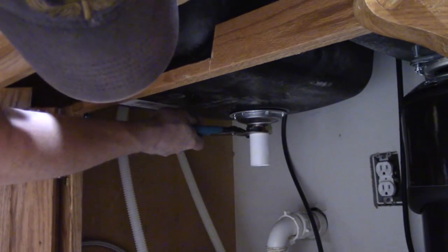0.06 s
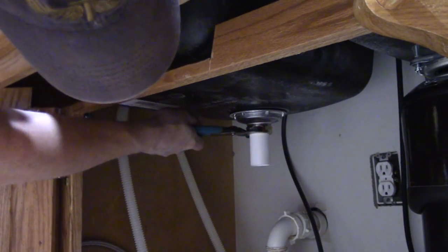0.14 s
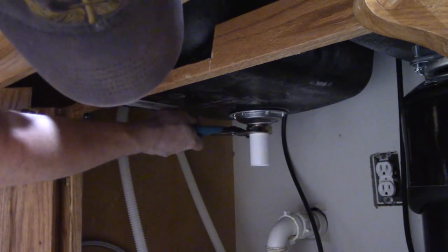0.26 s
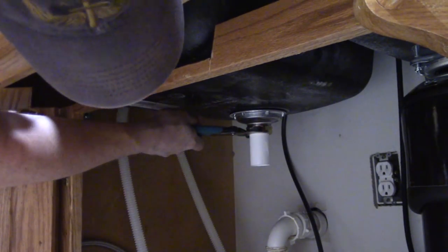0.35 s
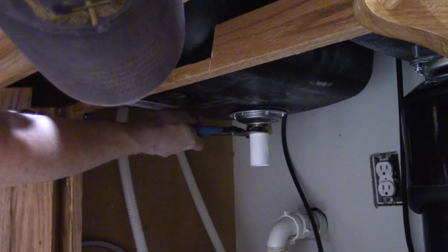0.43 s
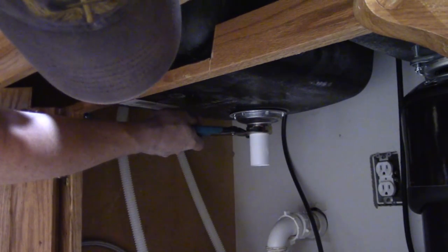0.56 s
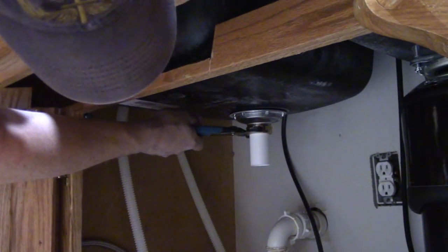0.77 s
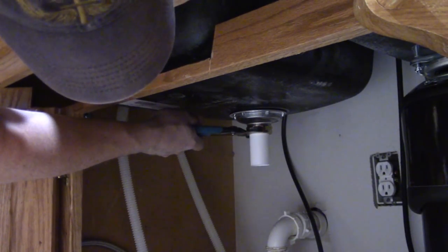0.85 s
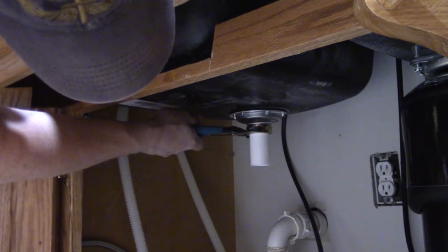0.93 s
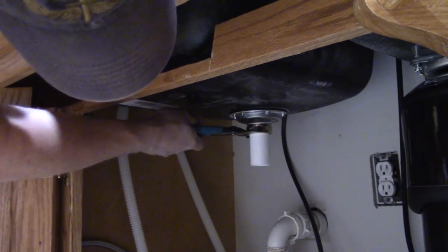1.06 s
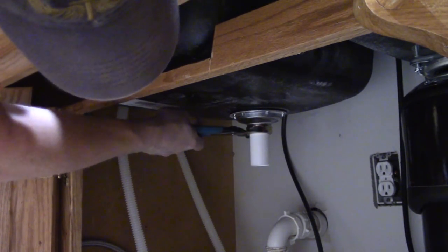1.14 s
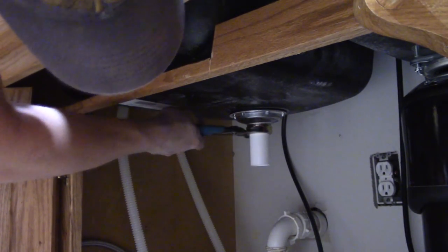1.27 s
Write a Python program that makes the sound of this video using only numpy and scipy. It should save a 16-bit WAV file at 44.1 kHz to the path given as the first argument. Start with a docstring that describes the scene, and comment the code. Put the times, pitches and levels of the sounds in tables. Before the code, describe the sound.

Hollow knocking and clacking as plier jaws scrape and jerk around a plastic nut beneath a sink

```python
"""Pliers slipping on a drain nut

Pliers bite on a plastic drain nut under a sink, slip round it in three jerks and let go; a sleeve rustles.
The jerks knock the basin, the jaws clack, scrape and tink, and the pliers and the steel strainer ring.
Each contact is shaped noise through resonances, with cabinet and kitchen echo; a low room murmur lies beneath.
The close, almost mono microphone overloads on the hardest knocks.
"""
import sys
import numpy as np
from scipy import signal
from scipy.fft import rfft, irfft
from scipy.io import wavfile

SR = 44100
rng = np.random.default_rng(int(sys.argv[2]) if len(sys.argv) > 2 else 0)


def dump_mix(stems):
    """Bounce the given channels to the path in sys.argv[1] as a 16-bit WAV at rate SR."""
    frames = np.atleast_2d(stems).T  # one column per channel
    limited = np.clip(frames, -1, 1)  # hard clip at full scale
    pcm = np.round(limited * 32767).astype(np.int16)
    wavfile.write(sys.argv[1], SR, pcm)


N = 57330
FREQS = np.maximum(np.fft.rfftfreq(2 * N, 1 / SR), 1)  # Hz, for filtering at double length

# Knocks passed to the basin [t/s, level/dB, contact cut-off f/Hz (low = soft push), cabinet boom level/dB]
KNOCKS = [(0.15, -29, 610, -48), (0.187, -24.5, 1090, -39), (.231, -15.5, 606, -31),
          (0.256, -17.5, 317, -51), (.267, -11.5, 1230, -33.5), (.296, -15, 1060, -36),
          (.326, -16, 940, -32.5), (0.342, -18.5, 1150, -34), (.395, -7, 620, -35), (.413, -9.5, 860, -45),
          (.434, -8.5, 556, -21), (.445, -7.5, 637, -28), (.53, -4.5, 1300, -29), (.562, -5.5, 380, -19),
          (.573, -15.5, 860, -22), (.593, -16, 700, -28), (.621, -10, 440, -23), (.643, -11.5, 395, -26),
          (0.681, -25, 367, -42), (.719, -18.5, 860, -30), (1.156, -30, 260, -52), (1.18, -30.5, 284, -45)]
# Jaw contacts [t/s, then level/dB of: plastic clack, sharp crack, pliers ring, strainer ring]
JAW_CONTACTS = [(.188, -29, -48.5, -41.5, -69), (.197, -30, -49, -47, -57), (.232, -36.5, -49, -55, -51),
                (.264, -28, -30.5, -45, -46), (.27, -27, -27, -28, -56), (.279, -37, -31.5, -36, -40),
                (.325, -40, -46, -53, -45), (.394, -38, -38.5, -54, -54), (.412, -25.5, -29, -54, -50),
                (.44, -54, -42, -63, -54), (.446, -30, -46, -57, -39), (.5295, -28, -21, -35, -36),
                (.557, -29, -27.5, -43, -36.5), (.567, -23, -42, -48, -35), (.576, -37, -29.5, -45, -29),
                (.594, -34.5, -39, -40, -31), (.619, -39, -37.5, -54, -40), (.708, -25.5, -58, -63, -60),
                (1.15, -65, -52.5, -76, -78), (1.178, -62, -49.5, -60, -80)]
# Scrapes of the jaws, and last a faint sleeve rustle [start t/s, length t/s, rasp level/dB, basin level/dB]
SCRAPES_AND_RUSTLE = [(0.276, .11, -42, -15.5), (0.396, .09, -53, -18), (0.531, 0.12, -29, -19),
                      (1.191, 0.063, -49.5, -49.5)]
# Tinks: short high rings of the first click and of one later contact [t/s, f/Hz, width f/Hz, level/dB]
TINKS = [(.189, 2380, 295, -35.5), (.19, 2970, 250, -41.5), (.4165, 5170, 131, -32.5)]

# Resonances of the basin [f/Hz, width f/Hz, relative level/dB]
BASIN_MODES = [(218.8, 24.8, -8.5), (260.5, 32, -8.5), (316, 28, -0.5), (387, 32.6, -3.5),
               (475.8, 37.3, -4), (530.3, 13.6, 1), (574, 24.5, 1.5), (637.4, 45.3, 0.5), (812.5, 66.5, -7),
               (938, 31, -4), (1004, 33.4, -4), (1047, 56, -7.5), (1281, 43, -13), (1618, 72, -16.5)]
# Resonances of the plastic nut [f/Hz, width f/Hz, relative level/dB]
NUT_MODES = [(1216, 110, 8), (1598, 210, 4.5), (2340, 150, -3), (2930, 740, -18)]
# Resonances of the pliers [f/Hz, width f/Hz, relative level/dB]
PLIERS_MODES = [(4120, 210, -7.5), (6560, 190, 1.5), (8660, 190, -0.5), (9800, 160, -11),
                (10350, 180, -11.5), (12800, 300, -16)]
# Resonances of the steel strainer [f/Hz, width f/Hz, relative level/dB]
STRAINER_MODES = [(4975, 97, 2), (5200, 100, 2.5), (5720, 100, 2), (6180, 140, 3.5), (6315, 200, 5),
                  (10000, 370, -17)]

# Spectrum of the sharp crack [f/Hz, relative level/dB]
CRACK_SPECTRUM = [(600, -36), (1500, 14), (3800, -0.5), (4500, -3), (6000, -5.5), (8000, -5.5),
                  (10500, -0.5), (11800, -16.5), (15500, -19)]
# Spectrum of the cabinet boom [f/Hz, relative level/dB]
BOOM_SPECTRUM = [(25, -23), (42, -16), (62, 1.5), (85, -7.5), (130, -10.5), (200, -6.5), (400, -20),
                 (1000, -66)]
# Spectrum of the rasp in scrapes and rustle [f/Hz, relative level/dB]
RASP_SPECTRUM = [(300, 4.5), (1200, 3.5), (2200, 2.5), (4000, -9), (6300, -7), (8000, -20), (10200, -12),
                 (12000, -28), (16000, -25)]
# Spectrum of the kitchen air [f/Hz, relative level/dB]
AIR_SPECTRUM = [(15, -43), (25, -4.5), (137, -11), (170, -5.5), (206, -10.5), (242, -3.5), (373, -3.5),
                (641, -7.5), (1070, -16), (1290, -21.5), (2050, -27.5), (14800, -49.5), (16000, -57)]
# Stereo width [f/Hz, side over mid level/dB]
WIDTH = [(60, -48), (200, -40), (500, -32.5), (2000, -21), (4000, -20), (9000, -14), (11000, -21)]

# Echo of each sound (cabinet fade to 1/e t/s, kitchen tail level/dB, kitchen t60 t/s)
KNOCK_ECHO = (0.0056, -15.5, 0.47)
BOOM_ECHO = (0.023, -14.5, 0.67)
CLACK_ECHO = (0.0077, -12.5, 0.45)
CRACK_ECHO = (0.008, -10.5, 0.41)
PLIERS_ECHO = (0.014, -7, 0.38)
STRAINER_ECHO = (0.009, -12, 0.52)
TINK_ECHO = (0.004, -15, 0.31)

GRAINS_PER_S, GRAIN_SCATTER_DB = 260, 4  # mean rate, standard deviation of grain strength
BLOW_WINDOW_S = 0.024  # a blow carries the energy of its RMS level held this long
AIR_DB, HUM_HZ, HUM_DB = -37, 164.7, -48  # levels are RMS
TOP_HZ = 15900  # upper limit of the recorder


def undb(db):
    """Turn decibels into gain."""
    return 10 ** (np.asarray(db) / 20)


def rms(x):
    """Root mean square."""
    return np.sqrt(np.mean(x ** 2))


def colour(points):
    """Minimum-phase response through (f/Hz, level/dB) points, so no sound precedes its cause."""
    hz, db = np.array(points, float).T
    curve_db = np.interp(np.log(FREQS), np.log(hz), db)
    cepstrum = irfft(np.log(undb(curve_db)))
    # Fold the cepstrum onto positive time
    cepstrum[1:N] *= 2
    cepstrum[N + 1:] = 0
    return np.exp(rfft(cepstrum))


def resonator(modes):
    """Response of a body as a sum of damped modes of alternating sign."""
    response = 0
    for k, (hz, width_hz, db) in enumerate(modes):
        detuning = (FREQS ** 2 - hz ** 2) / (FREQS * width_hz)
        response = response + (-1) ** k * undb(db) / (1 + 1j * detuning)
    return response


def through(x, response):
    """Filter a sound by a frequency response."""
    return irfft(rfft(x, 2 * N) * response)[:N]


def echo(fade_s, tail_db, t60_s):
    """Noise as dense reflections: a quick fade in the cabinet, then the tail of the kitchen."""
    t = np.arange(N) / SR
    cabinet = np.exp(-t / fade_s)
    kitchen = undb(tail_db) * undb(-60 * t / t60_s)
    return rng.standard_normal(N) * np.hypot(cabinet, kitchen)


def add_blow(out, start_s, sound, db):
    """Mix in one blow, scaled to the energy of its level held for the blow window."""
    start = int(np.clip(start_s * SR, 0, N - 1))
    gain = undb(db) * np.sqrt(BLOW_WINDOW_S * SR / np.sum(sound ** 2))
    out[start:] += (sound * gain)[:N - start]


def basin_knocks():
    """Each knock rings the basin, duller for a softer push, and makes the cabinet boom."""
    out = np.zeros(N)
    basin, boom = resonator(BASIN_MODES), colour(BOOM_SPECTRUM)
    for start_s, db, contact_hz, boom_db in KNOCKS:
        u = 1j * FREQS / contact_hz
        contact = 1 / (1 + np.sqrt(2) * u + u * u)  # second-order low-pass
        add_blow(out, start_s, through(echo(*KNOCK_ECHO), basin * contact), db)
        add_blow(out, start_s, through(echo(*BOOM_ECHO), boom), boom_db)
    return out


def jaw_clicks():
    """Teeth hit the nut: a plastic clack, a crack, and the ring of pliers and strainer."""
    out = np.zeros(N)
    parts = [
        (resonator(NUT_MODES), CLACK_ECHO),
        (colour(CRACK_SPECTRUM), CRACK_ECHO),
        (resonator(PLIERS_MODES), PLIERS_ECHO),
        (resonator(STRAINER_MODES), STRAINER_ECHO),
    ]
    for start_s, *levels_db in JAW_CONTACTS:
        for (body, space), db in zip(parts, levels_db):
            add_blow(out, start_s, through(echo(*space), body), db)
    return out


def tinks():
    """Short high rings of the first click and of one later contact, each a single struck mode."""
    out = np.zeros(N)
    for start_s, hz, width_hz, db in TINKS:
        ring = resonator([(hz, width_hz, 0)])
        add_blow(out, start_s, through(echo(*TINK_ECHO), ring), db)
    return out


def scrapes_and_rustle():
    """Uneven grains of friction, swelling and fading, heard as a rasp and through the basin modes."""
    out, t = np.zeros(N), np.arange(N) / SR
    rasp, basin = colour(RASP_SPECTRUM), resonator(BASIN_MODES)
    for start_s, length_s, rasp_db, basin_db in SCRAPES_AND_RUSTLE:
        progress = np.clip((t - start_s) / length_s, 0, 1)
        pressure = np.sqrt(np.maximum(np.sin(np.pi * progress), 0))
        grain_now = rng.random(N) < GRAINS_PER_S / SR
        strength = undb(GRAIN_SCATTER_DB * rng.standard_normal(N))
        grains = pressure * grain_now * strength
        for body, space, db in ((rasp, CRACK_ECHO, rasp_db), (basin, KNOCK_ECHO, basin_db)):
            sound = through(grains, body * rfft(echo(*space), 2 * N))
            # The energy is that of the RMS level held for the given length
            out += sound * undb(db) * np.sqrt(length_s * SR / (np.sum(sound ** 2) + 1e-18))
    return out


def room_tone():
    """Steady low murmur of the kitchen air as coloured noise, with a faint appliance hum as a sine."""
    air = through(rng.standard_normal(2 * N), colour(AIR_SPECTRUM))
    hum = np.sqrt(2) * np.sin(2 * np.pi * HUM_HZ * np.arange(N) / SR)
    return undb(AIR_DB) * air / rms(air) + undb(HUM_DB) * hum


def scene():
    """Everything sits in the centre; reflections, a short burst of noise, widen the treble a little."""
    mid = basin_knocks() + jaw_clicks() + tinks() + scrapes_and_rustle() + room_tone()
    scatter = rng.standard_normal(400)  # about 9 ms
    scatter /= np.linalg.norm(scatter)
    side = through(mid, colour(WIDTH) * rfft(scatter, 2 * N))
    return np.array([mid + side, mid - side])


def record(dry):
    """The recorder flattens the peaks towards full scale, then cuts the top with a steep low-pass."""
    flattened = dry / (1 + dry ** 8) ** (1 / 8)
    low_pass = signal.ellip(8, 0.2, 70, TOP_HZ, fs=SR, output="sos")
    return signal.sosfilt(low_pass, flattened)


dry = scene()
out = record(dry)
dump_mix(out)
```